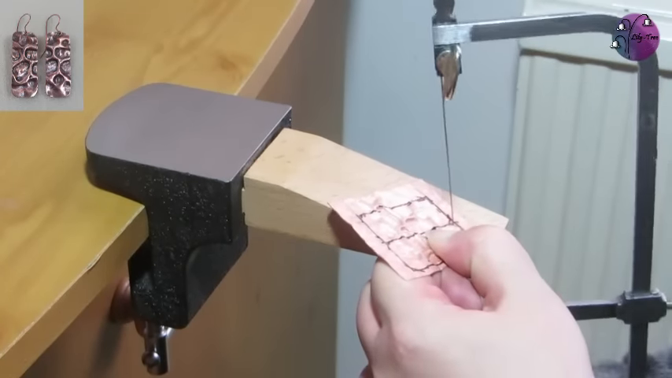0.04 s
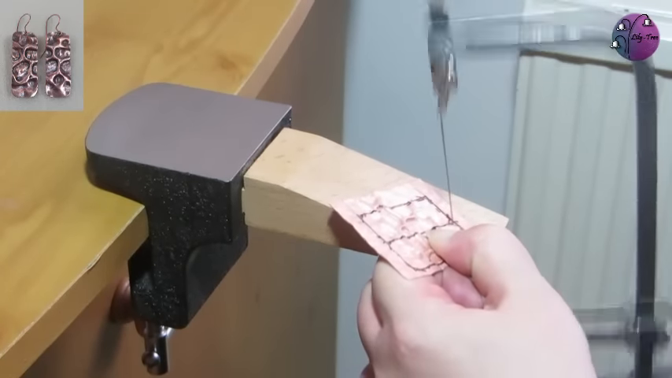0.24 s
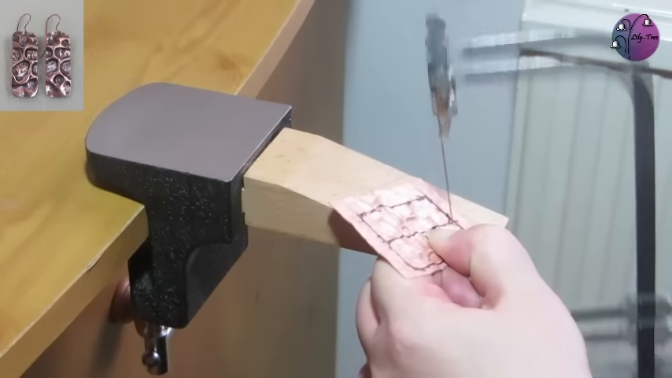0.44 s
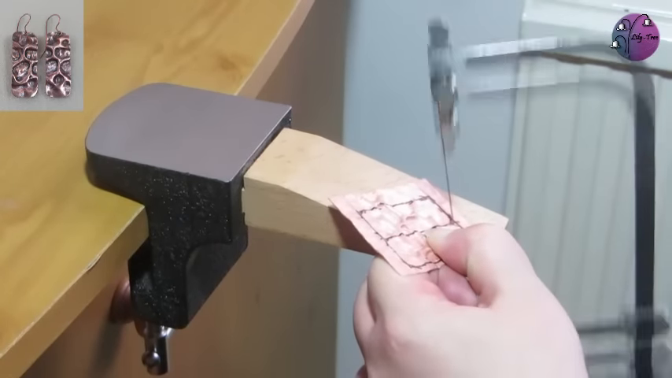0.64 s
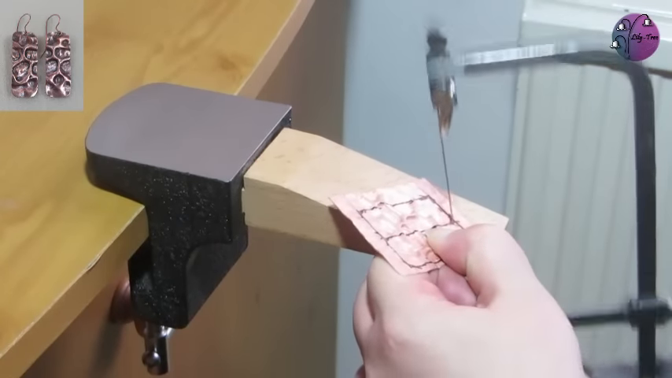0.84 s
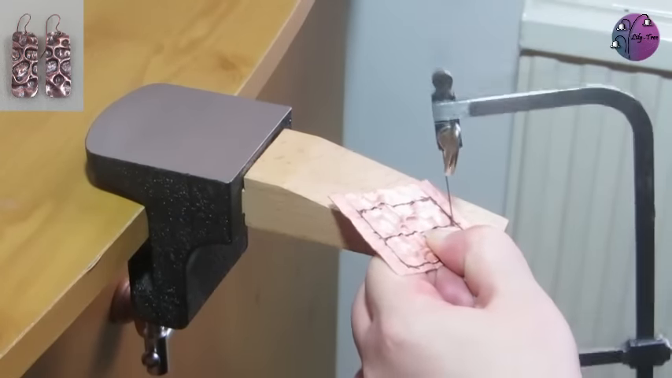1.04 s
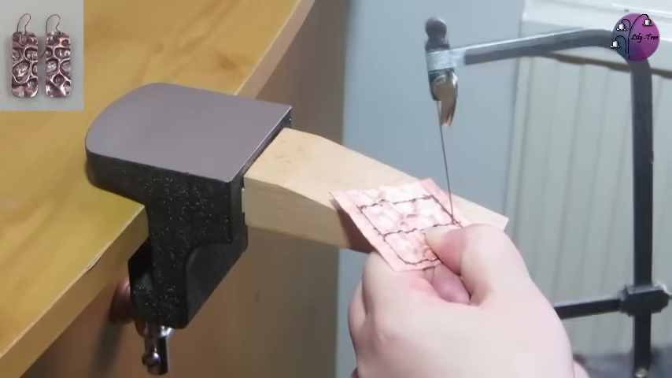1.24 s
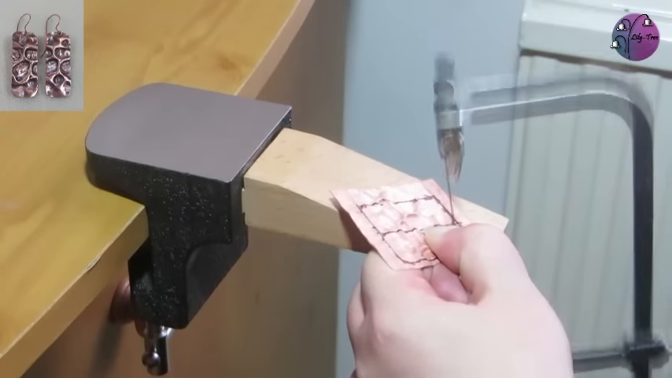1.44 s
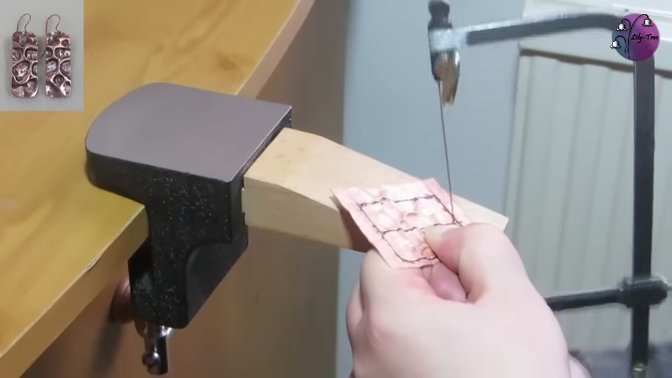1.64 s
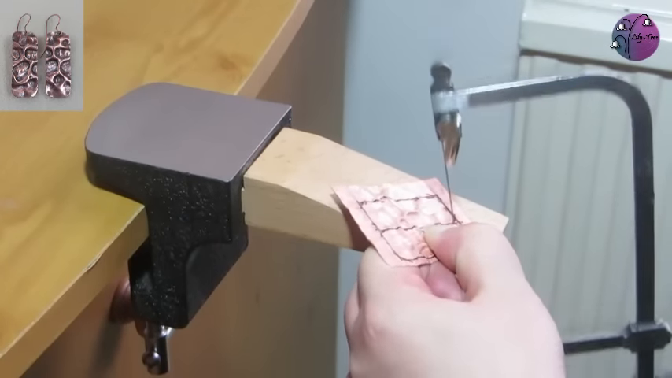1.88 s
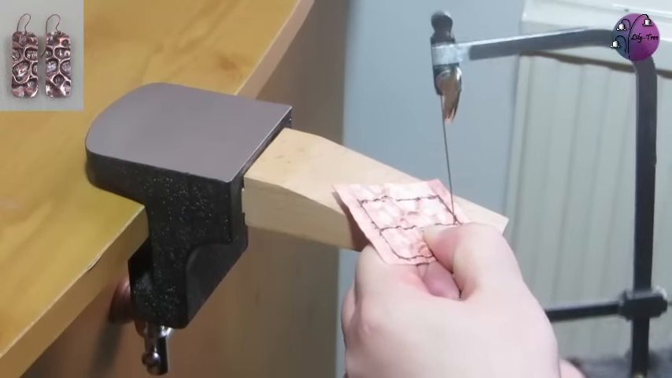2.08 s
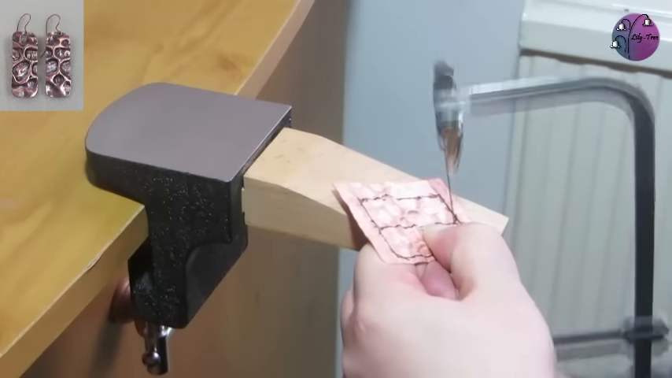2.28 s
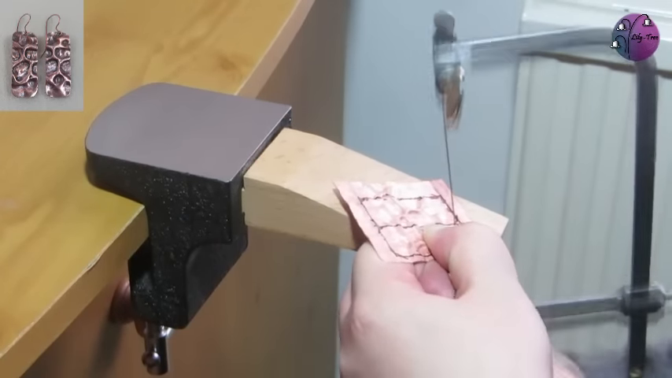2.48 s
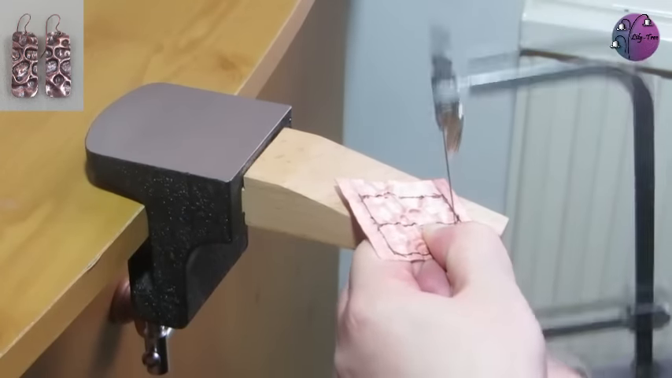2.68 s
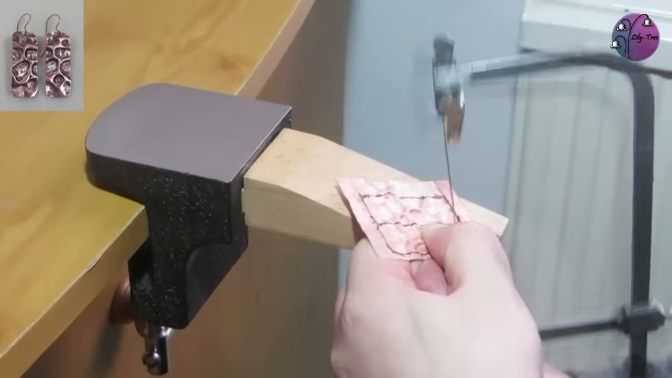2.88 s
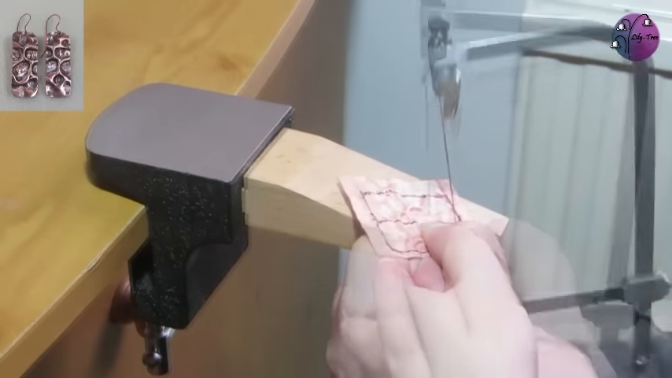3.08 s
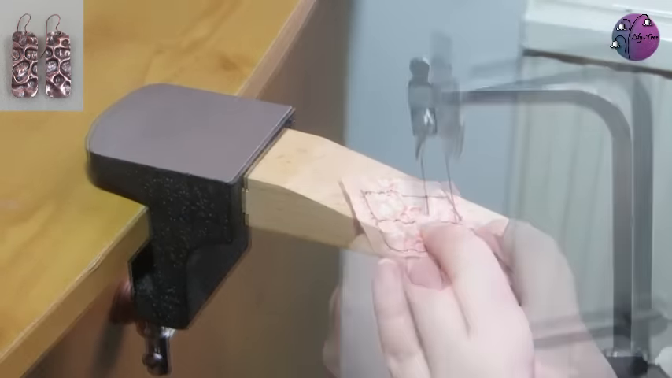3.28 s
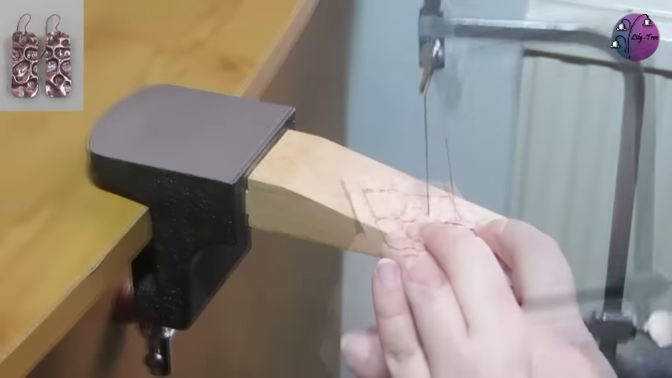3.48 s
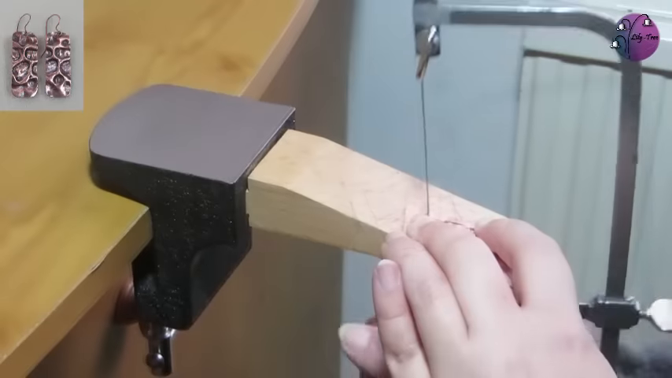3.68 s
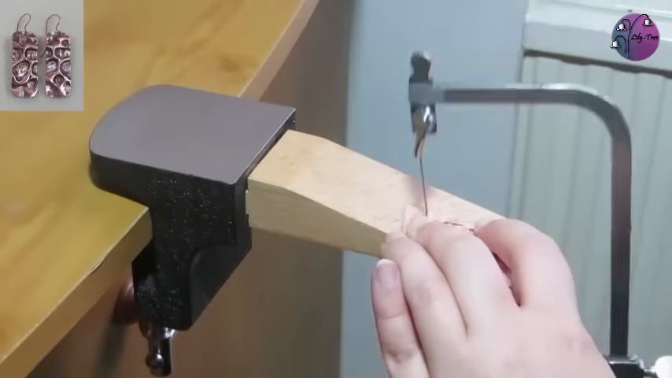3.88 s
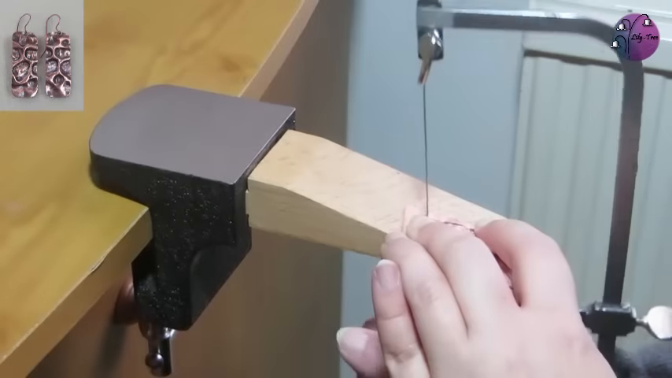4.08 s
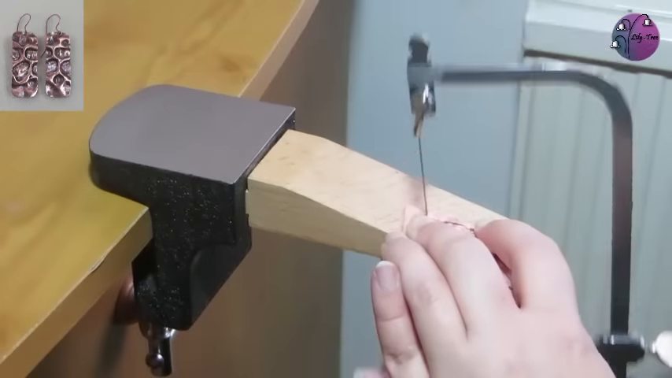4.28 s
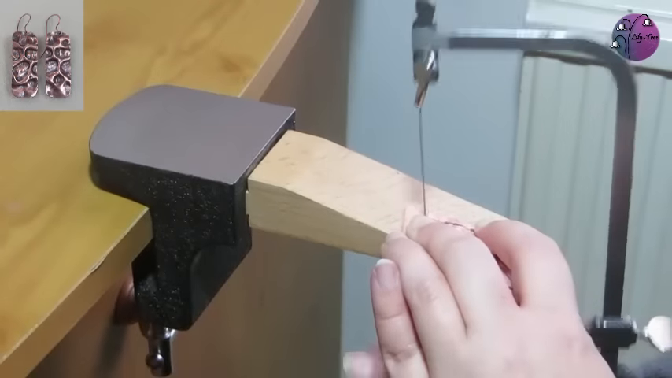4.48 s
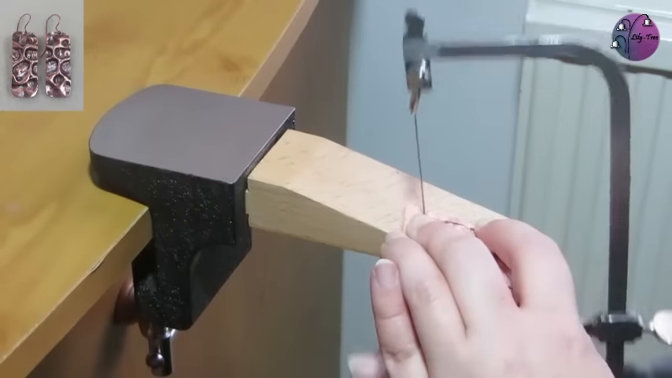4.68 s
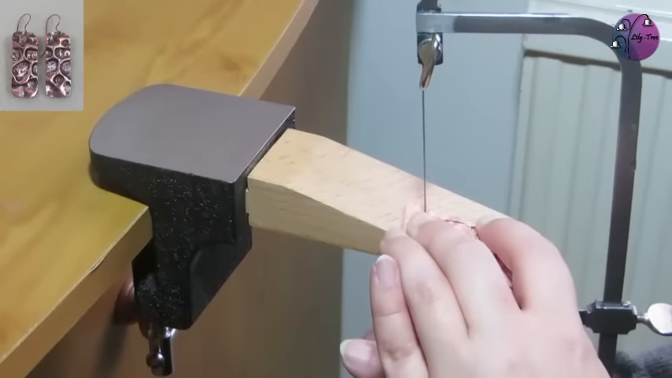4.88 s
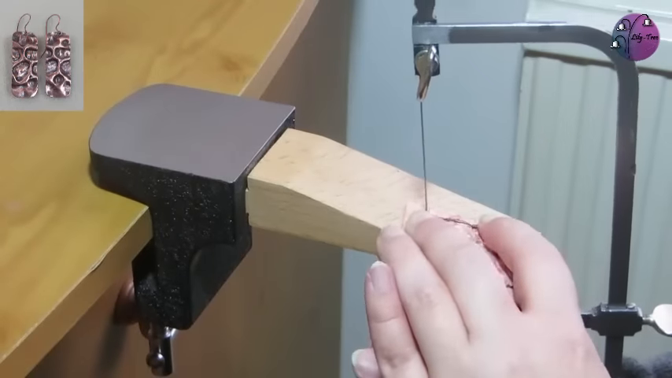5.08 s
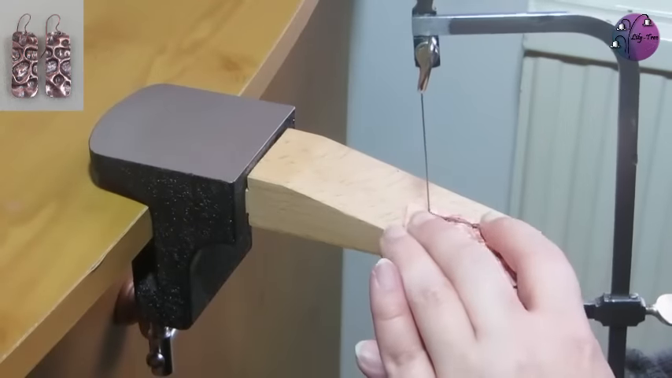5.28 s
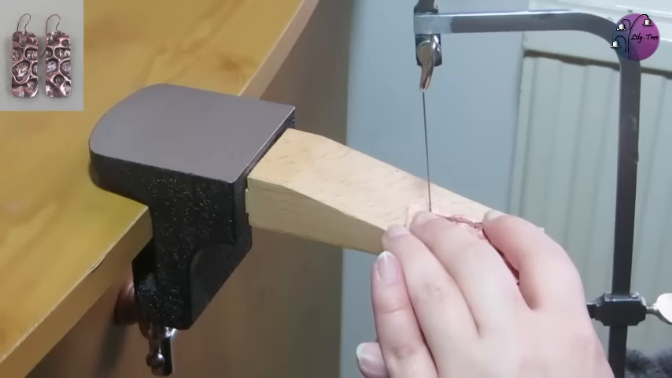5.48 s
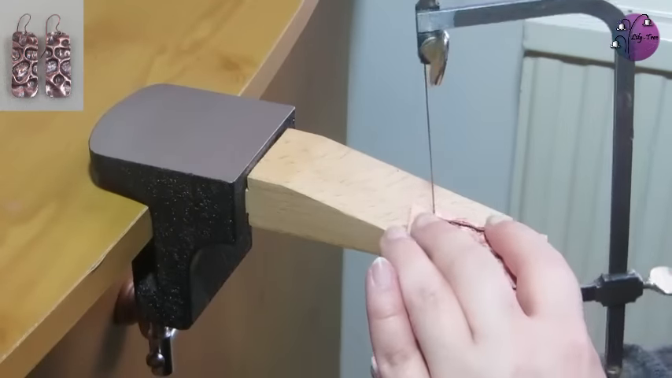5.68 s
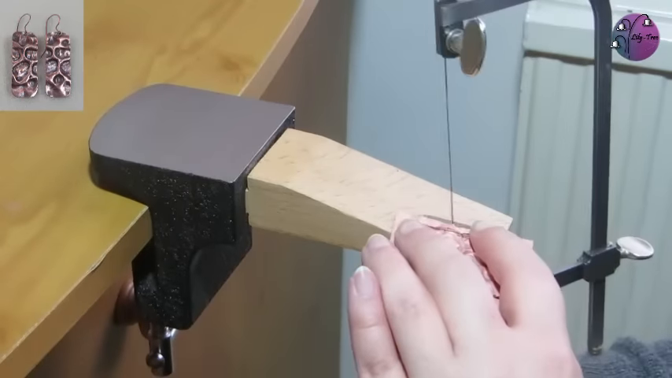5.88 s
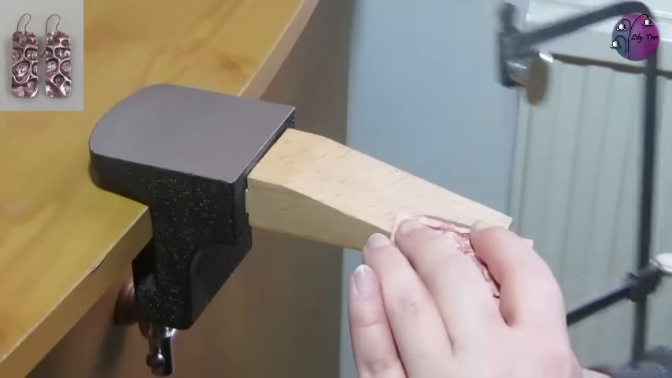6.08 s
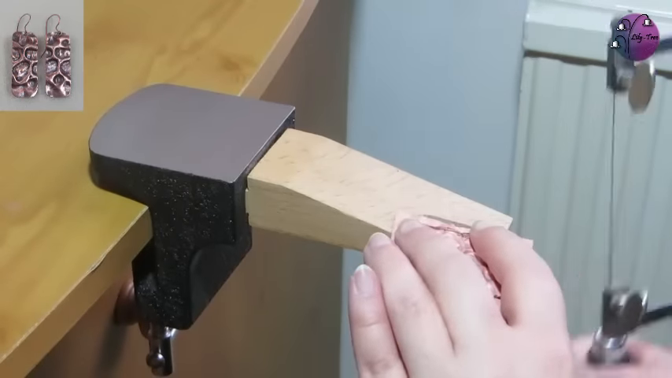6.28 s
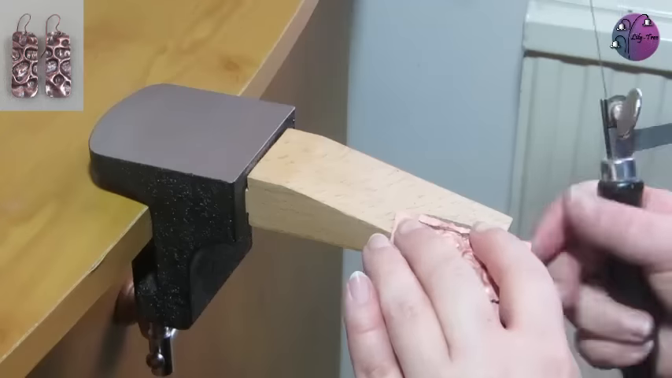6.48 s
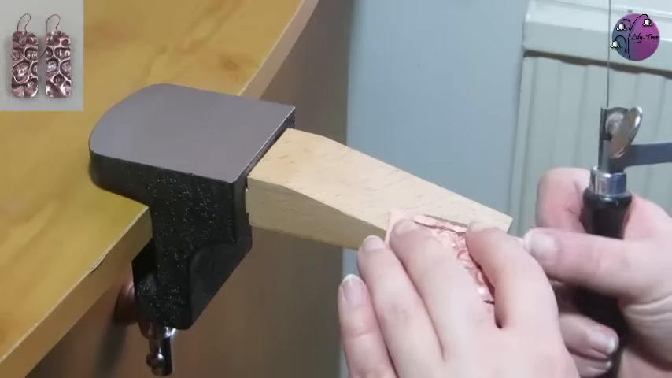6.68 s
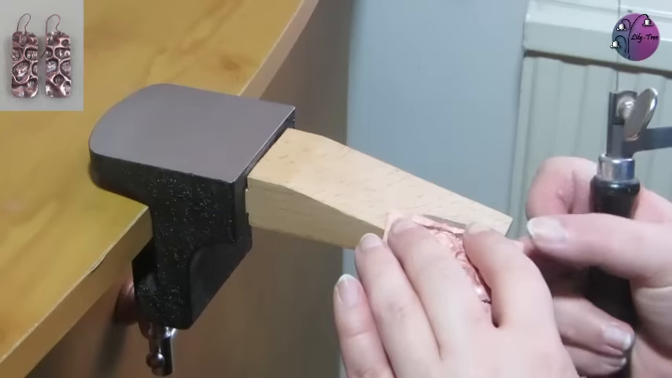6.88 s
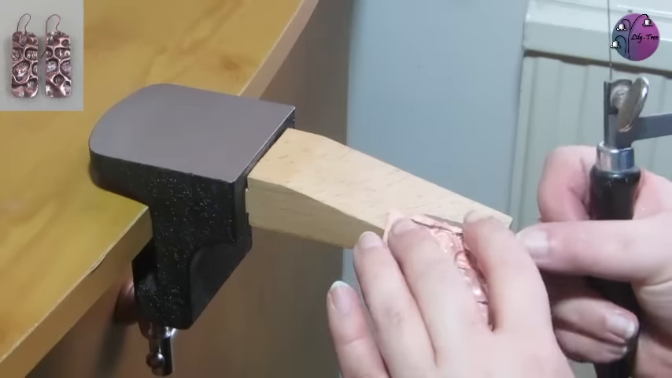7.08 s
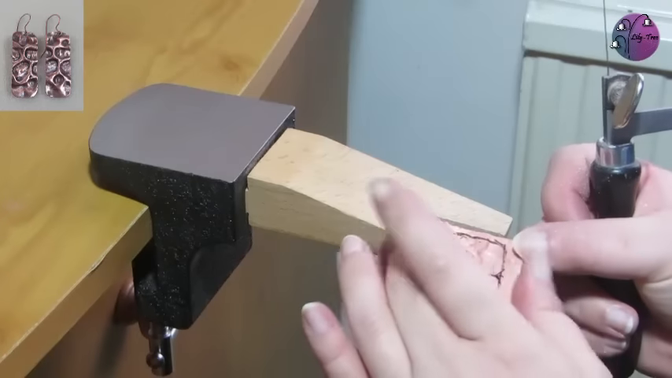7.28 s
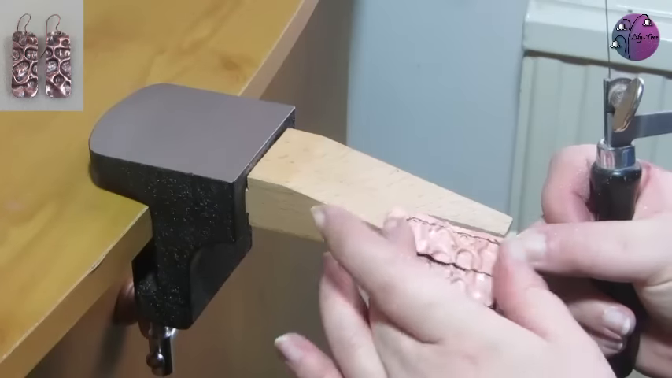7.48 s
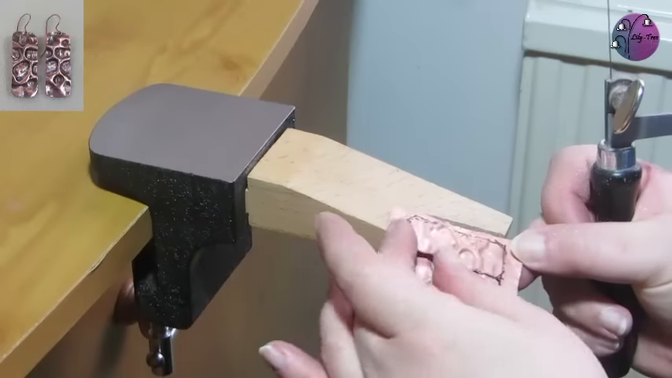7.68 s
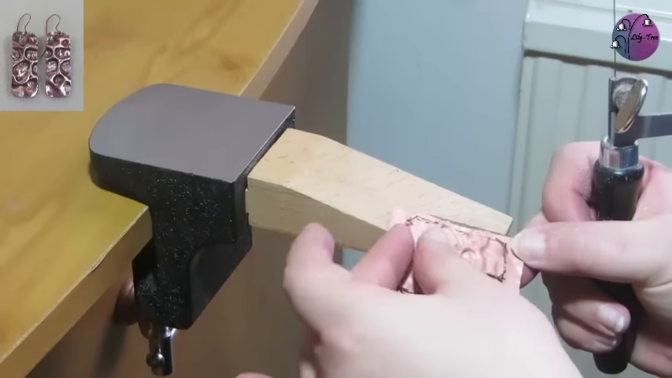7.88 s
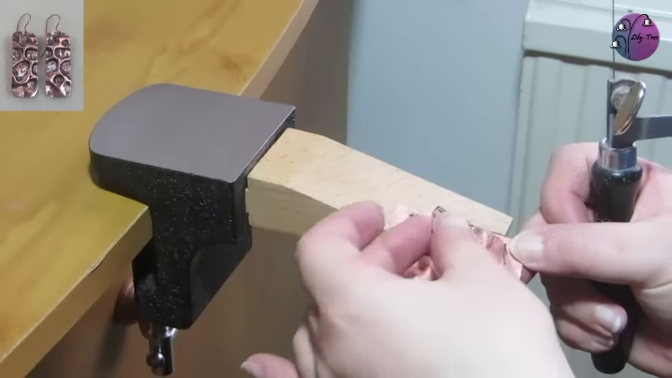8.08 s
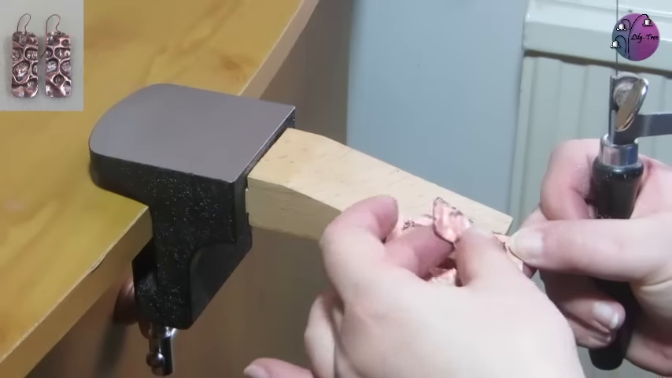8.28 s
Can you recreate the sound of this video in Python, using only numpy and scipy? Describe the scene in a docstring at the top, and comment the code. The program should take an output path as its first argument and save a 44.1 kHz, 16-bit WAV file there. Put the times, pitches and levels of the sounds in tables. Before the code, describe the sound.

Close, bright sawing of copper on a wooden bench, about three strokes a second, ends with a sharp snap-like breakthrough and quiet metallic handling.

```python
"""Under hiss, a thin whine and a soft airy wash (shaped noise and a blurred tone), the end of a saw stroke
opens, with the bench ringing on. From 0.33 s a jeweller's saw cuts copper sheet on a wooden bench peg, close by
in a small room: teeth bite down and drag up, as kicks and grit through rings of sheet, steel frame and bench.
The blade squeals and snags; at 3.2 s the sawing turns to a second colour, and later the blade breaks through.
From 4.88 s the pieces are handled: noise-burst clicks and knocks, gritty slides, blurred-tone squeaks."""
import sys
import numpy as np
from scipy import signal
from scipy.fft import rfft, irfft
from scipy.io import wavfile
from scipy.ndimage import uniform_filter1d

SR = 44100
rng = np.random.default_rng(int(sys.argv[2]) if len(sys.argv) > 2 else 0)


def to_wav(s):
    """Save 16-bit WAV."""
    ch = np.atleast_2d(s).T  # columns
    pcm = np.round(np.clip(ch, -1, 1) * 32767)  # PCM
    wavfile.write(sys.argv[1], SR, pcm.astype(np.int16))


N = 367441
TAPS = 8192
HZ = np.fft.rfftfreq(TAPS, 1 / SR)
EDGE_HZ = 15900
CHANGE_S = 3.2  # the sawing turns from its first colour to its second

# source levels here and below are ahead of room and output gain; colours are relative
# cut and return per row: t/s, cut length/s, cut top speed at/share of length, cut level/dB, squeal f/Hz,
# return top speed at/share of length, return level/dB, rest after return/s
STROKES = [(.329, .12, .38, -27.5, 5400, .18, -39.5, .05), (.691, 0.13, 0.64, -29, 5420, 0.24, -43, 0.036),
           (1.056, 0.14, 0.49, -30, 5405, 0.24, -37, 0.091),
           (1.465, 0.12, 0.62, -25.5, 3470, .17, -38.5, .025),
           (1.768, 0.17, .6, -32, 5730, 0.34, -44, 0.0085),
           (2.176, 0.15, 0.59, -32, 5900, 0.62, -42.5, 0.043),
           (2.574, .135, .47, -32, 4450, 0.63, -42.5, .005),
           (2.887, 0.16, 0.73, -33.5, 4300, 0.14, -40.5, 0.0047),
           (3.237, .13, .45, -30.5, 696.4, .06, -35.5, 0.011),
           (3.549, .133, .33, -29, 2712, .45, -33.5, 0.082), (3.894, 0.1, .71, -23, 3849, .2, -35.5, 0.012),
           (4.193, 0.14, 0.65, -25.5, 2722, .45, -31, 0.044),
           (4.553, 0.086, .28, -27, 3280, 0.17, -49, .025)]
# blade snags in the cut: t/s, peak/dB
SNAGS = [(.408, -21.5), (1.4336, -33), (2.585, -30), (3.242, -31), (4.044, -18), (4.1967, -34),
         (4.384, -21.5), (4.557, -28), (4.585, -9.5), (4.709, -15.5)]
# resonances of bench, sheet and frame, second colour: f/Hz, width/Hz (at least 13 in use), height/dB
RING_SECOND = [(88, 16, 13.6), (152, 6.55, 18), (177.6, 15, 15.3), (250.6, 9.2, 14.4), (354, 19, 15),
               (464, 20.4, 22.8), (506, 35.4, 12.1), (546.6, 17, 11.4), (704, 69, 8.5), (860, 68, 2.3),
               (1203, 32, 1.7), (1410, 180, 6.7), (2696, 30, 11), (2790, 70, 5), (2886, 30, 10),
               (2956, 30, 10), (3035, 50, 9), (3135, 60, 8), (3275, 60, 9), (3831, 20, 9), (4640, 22, 6.2),
               (5020, 24, 3.3), (6140, 220, 5.8), (7250, 35, 10), (7340, 24, 4.7)]


def amp(db):
    """Decibels to gain."""
    return 10 ** (np.asarray(db) / 20)


def evened(x):
    """Scales to rms 1."""
    return x / np.sqrt(np.mean(x ** 2) + 1e-20)


def read(points, hz, column=1):
    """Reads a table on a log-frequency axis."""
    table = np.array(points, float)
    return np.interp(np.log(hz + 1), np.log(table[:, 0] + 1), table[:, column])


def add(mix, s, sound):
    """Mixes a sound in at s seconds."""
    part = mix[max(round(s * SR), 0):][:len(sound)]
    part += sound[:len(part)]


def response(gain):
    """Minimum-phase impulse response of a gain curve, with energy 1."""
    cepstrum = irfft(np.log(np.maximum(gain / gain.max(), 1e-5)))
    cepstrum[1:TAPS // 2] *= 2
    cepstrum[TAPS // 2 + 1:] = 0
    taps = irfft(np.exp(rfft(cepstrum)))
    return taps / np.linalg.norm(taps)


def through(x, taps):
    """Plays x through an impulse response."""
    return signal.oaconvolve(x, taps)[:N]


def ringing(modes):
    """Gain of resonances that stand out of a flat response; no resonance is narrower than 13 Hz."""
    power = np.ones(len(HZ))
    for hz, width_hz, db in modes:
        width_hz = max(width_hz, 13)
        power += max(amp(db) ** 2 - 1, 0) / (1 + (2 * (HZ - hz) / width_hz) ** 2)
    return np.sqrt(power)


def below(hz, order=4):
    """Gain of a low-pass."""
    return 1 / np.sqrt(1 + (HZ / hz) ** (2 * order))


def fuzz(size, width_hz):
    """A slowly wandering complex amplitude: the ring of a rubbed resonance."""
    hz = np.fft.fftfreq(size, 1 / SR)
    noise = rng.standard_normal(size) + 1j * rng.standard_normal(size)
    z = np.fft.ifft(noise / (1 + (hz / width_hz) ** 2))
    return z / np.sqrt(np.mean(abs(z) ** 2))


def microphone_hiss():
    """Hiss of the microphones: shaped noise, nearly opposite in the two channels."""
    # f/Hz, level/dB
    hiss_colour = [(15, -18), (25, -13), (139, -9), (176, -5.5), (231, -11.5), (264, -6), (354, -5.5),
                   (558, -7), (903, -3.5), (3830, -14.5), (4260, -15.5), (13500, -27), (15000, -36)]
    # f/Hz, left-right likeness (-1 is opposite)
    likeness_table = [(60, -0.87), (400, -0.96), (1000, -0.95), (2400, -0.88), (6000, -0.75),
                      (15000, -0.34)]
    level_db = -51.5
    hz = np.fft.rfftfreq(N, 1 / SR)
    left, other = rfft(rng.standard_normal((2, N)))
    same = np.clip(read(likeness_table, hz), -1, 1)
    right = same * left + np.sqrt(1 - same ** 2) * other
    return amp(level_db) * evened(irfft(np.array([left, right]) * amp(read(hiss_colour, hz)), N))


def airy_wash():
    """Soft air in the room: shaped noise that rises and falls, then dies away."""
    # t/s, level/dB
    air_levels = [(0, -51), (.33, -59), (1.05, -54.5), (2.5, -59.5), (3.3, -48.5), (3.8, -64), (8.33, -82)]
    # f/Hz, level/dB
    air_colour = [(25, -11), (70, 9), (200, 2), (800, 0.5), (1800, -3), (5000, -10), (10000, -20.5),
                  (15000, -23)]
    hz, t = np.fft.rfftfreq(N, 1 / SR), np.arange(N) / SR
    noise = rfft(rng.standard_normal(N))
    air = evened(irfft(noise * amp(read(air_colour, hz)), N))
    return amp(np.interp(t, *np.transpose(air_levels))) * air


def thin_whine(whine_width_hz=60):
    """A thin gliding whine: a pure tone blended with one of wandering amplitude, for a fuzzy edge."""
    # t/s, f/Hz, level/dB, fuzziness/0-1
    whine_track = [(0, 1340, -58, 0.2), (1.101, 1330, -55, 0.5), (2.2, 1334, -64.5, 0.6),
                   (3.2, 1327, -68, 0.58), (3.6, 1465, -73.5, 0.92), (8.33, 1450, -71, .95)]
    t = np.arange(N) / SR
    s, *columns = np.transpose(whine_track)
    pitch_hz, db, blur = (np.interp(t, s, column) for column in columns)
    blur = np.clip(blur, 0, 1)
    amplitude = np.sqrt(1 - blur ** 2) + blur * fuzz(N, whine_width_hz)
    tone = amplitude * np.exp(2j * np.pi * np.cumsum(pitch_hz) / SR)
    return amp(db) * evened(tone.real)


def blows(events, gain, chatter_s, chatter_db):
    """Each blow is a sharp contact and a brief chatter, ringing the same body."""
    t, out, body = np.arange(TAPS) / SR, np.zeros(N), response(gain)
    for s, peak_db in events:
        contact = rng.standard_normal(TAPS) * np.exp(-t / chatter_s)
        contact *= amp(chatter_db) / np.linalg.norm(contact)
        contact[0] += 1
        sound = signal.fftconvolve(contact, body)
        add(out, s, amp(peak_db) * sound / abs(sound).max())
    return out


def peg_knocks():
    """Dull blows: the bench ringing on from the opening stroke, then the sheet knocking on the peg."""
    # first row is the end of the opening stroke: t/s, peak/dB
    knock_events = [(0, -30), (.787, -21.5), (1.145, -22), (1.545, -23), (1.905, -29), (2.28, -26),
                    (4.605, -26), (5.112, -46), (5.131, -36.5), (5.47, -56), (5.667, -54), (5.91, -59),
                    (6.81, -59), (7.378, -47)]
    # f/Hz, level/dB
    knock_colour = [(30, -28), (60, -7), (88, 11.5), (115, -7), (150, 11.5), (190, -0.5), (245, -11),
                    (370, -16), (600, -25), (900, -10.5), (1500, -33), (3000, -41.5)]
    return blows(knock_events, amp(read(knock_colour, HZ)), chatter_s=.016, chatter_db=-7)


def slides(grain_db=4, rub_hz=450):
    """Gritty scraping noise over a dull rub: the end of the opening stroke, then blade and fingers on copper."""
    # first row is the end of the opening stroke: t/s, length/s, level/dB, dull rub re scrape/dB
    slide_events = [(0, 0.022, -45, -21), (4.732, 0.1, -46.5, -25), (5.105, 0.027, -54.5, 7),
                    (5.73, 0.088, -58, -13), (5.836, 0.14, -57.5, -18), (6.111, 0.12, -60, -14),
                    (6.736, 0.12, -63.5, -8), (7.38, 0.049, -65.5, 2), (7.858, 0.1, -68, -23),
                    (8.269, 0.053, -70, -1)]
    # f/Hz, level/dB
    slide_colour = [(530, -2.5), (900, -1), (1420, -3), (2200, -5.5), (2450, -9), (3610, -4.5),
                    (4010, -7.5), (5080, -7), (6500, -11.5), (7760, -7.5), (15000, -25)]
    scrape, rub = np.zeros((2, N))
    for s, length_s, db, rub_db in slide_events:
        press = amp(db) * signal.windows.tukey(int(length_s * SR), .6)
        add(scrape, s, press)
        add(rub, s, amp(rub_db) * press)
    grains = amp(grain_db * evened(uniform_filter1d(rng.standard_normal(N), size=150)))
    drive = evened(grains * rng.standard_normal(N))
    scraped = through(drive * scrape, response(amp(read(slide_colour, HZ))))
    rubbed = through(drive * rub, response(below(rub_hz) * (HZ / (HZ + 400)) ** 2))
    return scraped + rubbed


def cuts_and_returns():
    """Stroke rows (t/s, length/s, top speed share, level/dB, catch share): quick cuts catch hardest."""
    catch_s, return_catch = .045, .38  # catch: share of the force there at once, e-fold per catch_s in cuts
    turn_s = .006  # the arm barely pauses at the bottom of its travel
    stick_s = .05  # a blade that snags this soon after the turn stays put until the snag gives way
    stop_s = 4.88  # the sawing ends
    cuts, returns = [], []
    next_starts = [row[0] for row in STROKES[1:]] + [stop_s]
    for (s, length_s, top, db, _, return_top, return_db, rest_s), next_s in zip(STROKES, next_starts):
        cuts.append((s, length_s, top, db, np.exp(-top * length_s / catch_s)))
        turned_s = s + length_s + turn_s
        freed_s = max([turned_s] + [snag_s for snag_s, _ in SNAGS if snag_s < turned_s + stick_s])
        returns.append((freed_s, next_s - rest_s - freed_s, return_top, return_db, return_catch))
    return cuts, returns


def motion(strokes, shakes, follow, grab_s=0.006, bench_lag=1.14):
    """Blade speed, and the force on the edge, the sheet and the bench, through a set of strokes."""
    speed, edge, sheet, bench = np.zeros((4, N))
    average_db = np.mean([row[3] for row in strokes])
    sheet_follow, bench_follow = follow
    for s, length_s, top, db, catch in strokes:
        sheet_db, bench_db = shakes[int(s > CHANGE_S)]
        harder_db = db - average_db
        u = np.linspace(0, 1, int(length_s * SR))
        swing = abs(np.sin(np.pi * np.interp(u, [0, np.clip(top, .02, .98), 1], [0, .5, 1])))
        # the teeth catch at once, then cut harder as the arm gathers speed
        caught = catch * np.minimum(u * length_s / grab_s, 1) * np.sqrt(1 - u)
        force = abs(caught + (1 - catch) * swing ** 1.84)
        add(speed, s, swing)
        add(edge, s, amp(db) * force)
        add(sheet, s, amp(sheet_db + sheet_follow * harder_db) * force ** 0.76)
        # the heavy bench swells later and shakes on as the blade stops
        shake = np.interp(np.linspace(0, 1, int(len(u) * bench_lag)), u, force)
        add(bench, s, amp(bench_db + bench_follow * harder_db) * shake ** 0.21)
    return speed, edge, sheet, bench


def teeth(speed, nominal_tooth_hz, grit, uneven_db):
    """Each passing tooth gives a kick of its own size and tears off a chip with a puff of grit."""
    wobble = evened(uniform_filter1d(rng.standard_normal(N), size=60))
    rate_hz = nominal_tooth_hz * (.4 + .7 * speed) * np.exp(.12 * wobble)
    turns = np.cumsum(rate_hz) / SR
    tooth = turns.astype(int)
    size = evened(amp(uneven_db * np.clip(rng.standard_normal(N), -2, 2)))[tooth]
    kicks = np.diff(tooth, prepend=0) * np.sqrt(SR / rate_hz) * size
    kicks -= uniform_filter1d(kicks, size=600)  # the steady push makes no sound
    puff = evened(0.44 + np.exp(-(turns % 1) / 0.43))
    chips = puff * size * rng.standard_normal(N)
    grit = np.clip(grit, 0, 1)
    return np.sqrt(1 - grit) * kicks + np.sqrt(grit) * chips


def patchy(x, depth_db):
    """The blade twists in the kerf, so patches of the spectrum flare and fade within a stroke."""
    z = signal.stft(x, nperseg=512)[2]
    patches = uniform_filter1d(rng.standard_normal(z.shape), size=6, axis=0)
    patches = evened(uniform_filter1d(patches, size=6, axis=1))
    return signal.istft(z * evened(amp(depth_db * patches)), nperseg=512)[1][:N]


def sawing(strokes, shakes, follow, column, nominal_tooth_hz, grit, uneven_db, patchy_db, edge_db):
    """The teeth drive the bright cutting edge and frame, the sheet in the middle and the bench below."""
    # rasp, first colour: f/Hz, down stroke level/dB, up stroke level/dB
    rasp_first = [(30, -30, 5), (70.4, -4, -1), (228, -13, 5.5), (510, -10.5, -5), (1040, -7.5, -0.5),
                  (1770, -10.5, -5.5), (2800, -8, -5.5), (3630, -10, -11.5), (4800, -5.5, -1.5),
                  (8060, -10, -10.5), (12600, -18, -14.5), (15100, -18.5, -18)]
    # rasp, second colour, stronger around 500-700 Hz with its ring: f/Hz, down stroke level/dB, up stroke level/dB
    rasp_second = [(30, -26, -23), (75, -5, -13), (226, -14, -11), (486, -9, -12.5), (1060, -3.5, 5),
                   (1740, -12, -9), (2850, -2, -2.5), (3900, 3.5, -4), (5400, -2.5, -10.5),
                   (9200, -2.5, -10), (13200, -11.5, -15.5), (15600, -20, -46)]
    # resonances of bench, sheet and frame, first colour: f/Hz, width/Hz (at least 13 in use), height/dB
    ring_first = [(80.6, 32, 13.5), (145, 7.1, 20), (172.6, 4.5, 16), (330.5, 9.8, 19.5), (396, 56, 19.5),
                  (445, 47, 19), (627, 46, 17), (773, 99, 14.5), (1016, 120, 7), (1259, 58, 15),
                  (1440, 110, 9.5), (2130, 300, 6), (2240, 270, 7), (3060, 330, 11), (3000, 74, 1),
                  (3268, 21, 15.5), (3300, 14, 10), (4830, 14, 7), (5190, 47, 4.5), (5050, 33, -1),
                  (5360, 41, 8.5), (5530, 58, 9), (5890, 38, 6.5), (7100, 79, 3)]
    speed, edge, sheet, bench = motion(strokes, shakes, follow)
    drive = patchy(teeth(speed, nominal_tooth_hz, grit, uneven_db), patchy_db)
    forces = amp(edge_db) * edge, sheet, bench
    low, middle = below(250), below(2000)
    bands = np.sqrt(1 - middle ** 2), middle * np.sqrt(1 - low ** 2), low
    first = np.arange(N) < CHANGE_S * SR
    colours = (first, rasp_first, ring_first), (~first, rasp_second, RING_SECOND)
    out = np.zeros(N)
    for active, rasp, ring in colours:
        body = amp(read(rasp, HZ, column)) * ringing(ring) * below(EDGE_HZ, order=20) * HZ / (HZ + 15)
        for force, band in zip(forces, bands):
            out += through(drive * force * active, response(body * band))
    return out


def down_strokes(cuts):
    """The teeth bite: fast, gritty kicks, strongest in the work."""
    # shake of an average cut, rows first colour, second colour: sheet/dB, bench/dB
    cut_shake = [(-33.5, -34), (-29, -34.5)]
    follow = .69, .38  # sheet, bench: dB more shake per dB of a harder stroke
    return sawing(cuts, cut_shake, follow, column=1, nominal_tooth_hz=899.0, grit=0.73,
                  uneven_db=2, patchy_db=2.0, edge_db=-1.02)


def blade_tone(length_s, first_hz, last_hz, width_hz):
    """Rubbing excites one mode of the taut blade for a moment; the pitch slides if its free length changes."""
    ring = fuzz(SR // 4, width_hz)[:int(length_s * SR)]
    turn = np.exp(2j * np.pi * np.cumsum(np.linspace(first_hz, last_hz, len(ring))) / SR)
    return evened((ring * turn).real) * signal.windows.tukey(len(ring), .7)


def singing(squeak_width_hz=80):
    """The blade squeals at top speed of each cut, purer the harder it is pushed; short squeaks come later."""
    # squeal re cut level/dB: first colour, second colour
    squeal_levels = [-7, -11]
    # short squeaks, one rising in a late return, the rest in handling:
    # t/s, length/s, first f/Hz, last f/Hz, level/dB
    squeak_events = [(4.364, 0.045, 4500, 5400, -41.5), (5.757, 0.034, 3660, 3690, -57.5),
                     (5.835, 0.04, 3560, 3700, -64), (5.892, .08, 5200, 5170, -66),
                     (6.126, 0.071, 5220, 5050, -62)]
    squeal_share = .45  # of the length of the cut
    width_share, narrowing = .026, 1.6  # share of pitch in an average cut; dB narrower per dB harder
    out = np.zeros(N)
    average_db = np.mean([row[3] for row in STROKES])
    for s, length_s, top, db, hz, *_ in STROKES:
        width_hz = hz * width_share * amp(narrowing * (average_db - db))
        tone = blade_tone(squeal_share * length_s, hz, hz, width_hz)
        squeal_db = db + squeal_levels[int(s > CHANGE_S)]
        add(out, s + length_s * (top - squeal_share / 2), amp(squeal_db) * tone)
    for s, length_s, first_hz, last_hz, db in squeak_events:
        add(out, s, amp(db) * blade_tone(length_s, first_hz, last_hz, squeak_width_hz))
    return out


def snags():
    """The blade snags in the cut: bright blows through the resonances of the second colour."""
    # f/Hz, level/dB
    snag_colour = [(120, -36), (250, -3), (1100, -9.5), (2200, -9), (3200, -1.5), (4200, -1.5), (6200, 5),
                   (9000, 5), (11000, 1.5), (13000, -3), (16000, -14)]
    body = amp(read(snag_colour, HZ)) * ringing(RING_SECOND)
    return blows(SNAGS, body, chatter_s=.0022, chatter_db=11)


def up_strokes(returns):
    """The teeth drag back: slower, grittier and patchier kicks."""
    # shake of an average return, rows first colour, second colour: sheet/dB, bench/dB
    return_shake = [(-45, -49), (-43, -49)]
    follow = .83, .055  # sheet, bench: dB more shake per dB of a harder stroke
    return sawing(returns, return_shake, follow, column=2, nominal_tooth_hz=705.4, grit=0.81,
                  uneven_db=1.5, patchy_db=3.5, edge_db=-1.5)


def handling_clicks():
    """Light clicks of copper and saw: blows that ring the loose sheet."""
    # t/s, peak/dB
    click_events = [(5.109, -53), (5.769, -45), (5.854, -40.5), (5.94, -43.5), (6.135, -46), (6.603, -50),
                    (6.892, -47.5), (7.3437, -33), (7.351, -42), (7.376, -32.5)]
    # f/Hz, level/dB
    click_colour = [(120, -17), (300, -8), (480, 0), (640, -12), (900, -2), (1100, -10), (1600, -1.5),
                    (2200, -7), (3300, -8.5), (5000, -2), (8000, -16), (12000, -14), (15500, -22.5)]
    # loose sheet: f/Hz, width/Hz, height/dB
    click_ring = [(464, 34, 8), (1560, 96, 10), (1980, 100, 7), (2210, 62, 15.5), (2730, 80, 6),
                  (4620, 90, 3), (5700, 62, 5)]
    body = amp(read(click_colour, HZ)) * ringing(click_ring)
    return blows(click_events, body, chatter_s=0.009, chatter_db=6.5)


def room(x, early_db, early_s, tail_db):
    """Quick reflections from bench top and wall, then a short tail; the bass stays near the middle."""
    # f/Hz, T60/s
    t60_table = [(100, 0.5), (500, 0.35), (3000, 0.38), (12000, 0.21)]
    # echoes' side gain: f/Hz, level/dB, third column not read
    side_table = [(80, -14.5, -9), (250, -10.5, -7), (1010, -9.5, -1), (4180, -7, .5), (10000, -3.5, 2)]
    t = np.arange(SR // 2) / SR
    signs = rng.choice([-1., 1.], (2, 2, len(t)))
    early, late = signs * (rng.random((2, 2, len(t))) < 3000 / SR)  # 3000 echoes a second
    early *= np.exp(-t / early_s) * (t > .001)
    hz, frame_s, z = signal.stft(late * (t > .008), SR, nperseg=256)
    decay = amp(-60 * frame_s / read(t60_table, hz)[:, None])
    late = signal.istft(z * decay, SR, nperseg=256)[1][:, :len(t)]
    early *= amp(early_db) / np.linalg.norm(early[0])
    late = late * amp(tail_db) / np.linalg.norm(late[0])
    echoes = rfft(early + late)
    echoes[1] *= amp(read(side_table, np.fft.rfftfreq(len(t), 1 / SR)))
    mid, side = (through(x, taps) for taps in irfft(echoes))
    return np.array([x + mid + side, x + mid - side])


def scene():
    """Saw strokes and snags, then the handling, all in the room, over hiss, air and whine."""
    cuts, returns = cuts_and_returns()
    work = down_strokes(cuts) + up_strokes(returns) + singing() + snags()
    handling = handling_clicks() + peg_knocks() + slides()
    near = room(work + handling, early_db=-7, early_s=0.012, tail_db=-7.5)
    balance_gain = amp([[-.4], [.4]])  # dB, left and right: the left a little quieter than the right
    return near * balance_gain + microphone_hiss() + airy_wash() + thin_whine()


def record(dry):
    """The recorder's band limit: a steep low-pass."""
    lowpass = signal.firwin(511, EDGE_HZ, window=("kaiser", 9), fs=SR)
    return signal.oaconvolve(dry, lowpass[None], "same")


dry = scene()
out = record(dry)
to_wav(out)
```